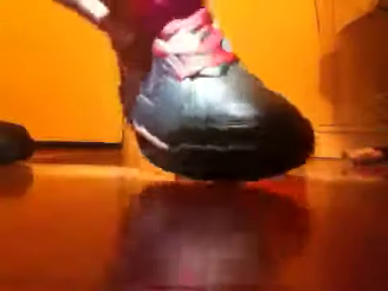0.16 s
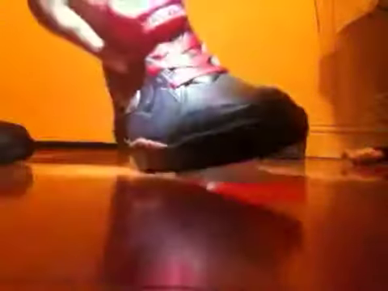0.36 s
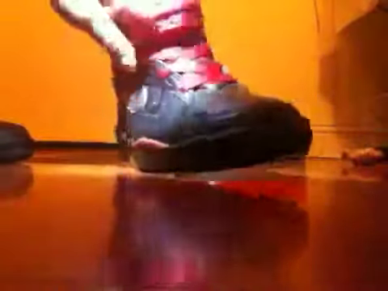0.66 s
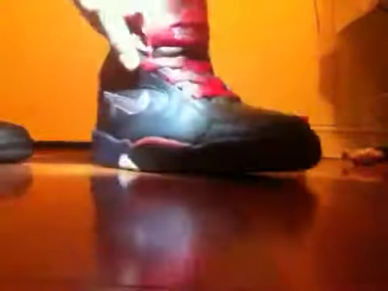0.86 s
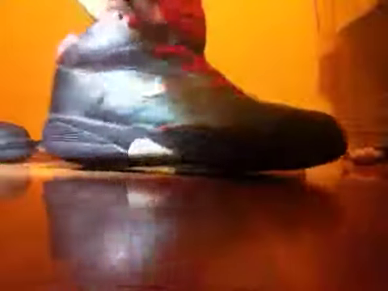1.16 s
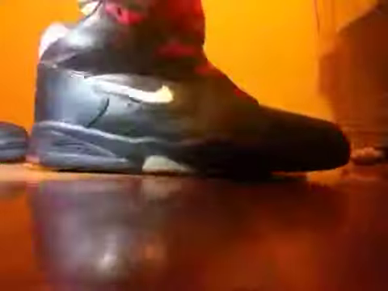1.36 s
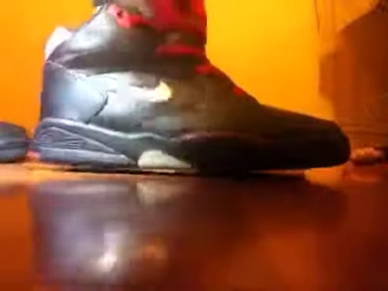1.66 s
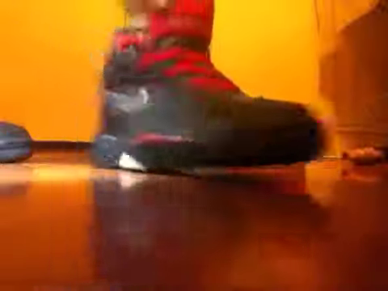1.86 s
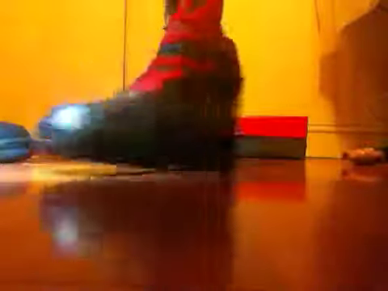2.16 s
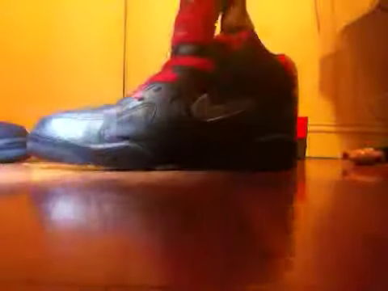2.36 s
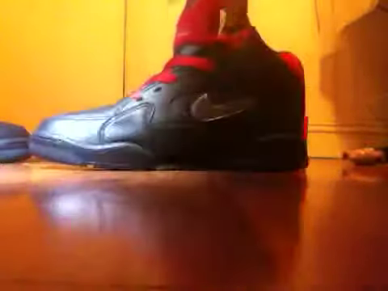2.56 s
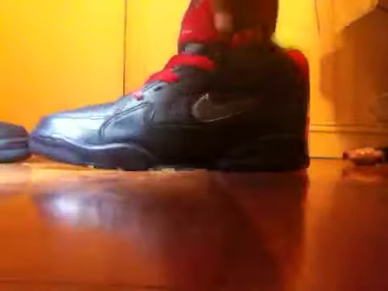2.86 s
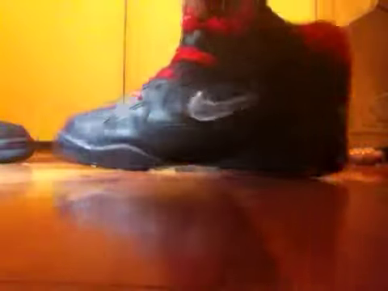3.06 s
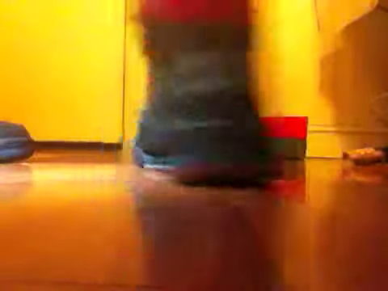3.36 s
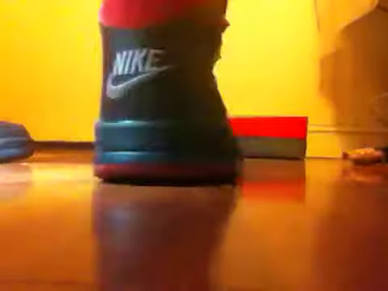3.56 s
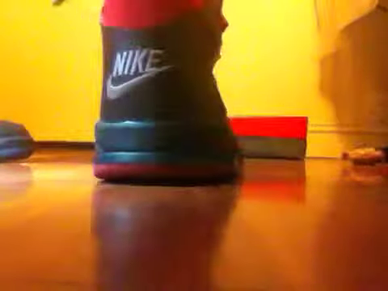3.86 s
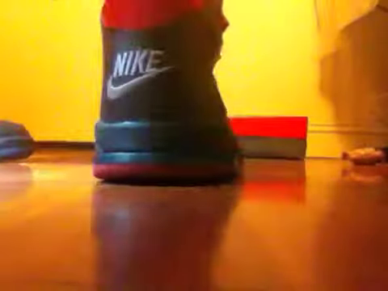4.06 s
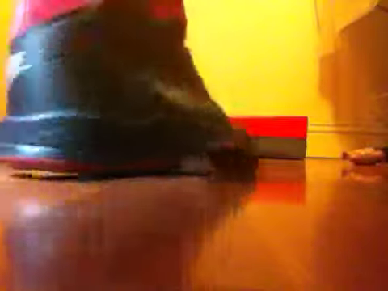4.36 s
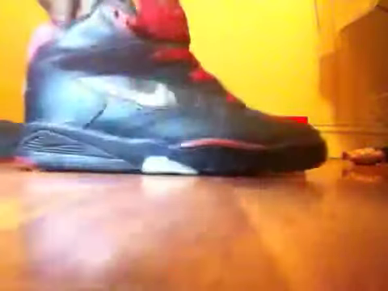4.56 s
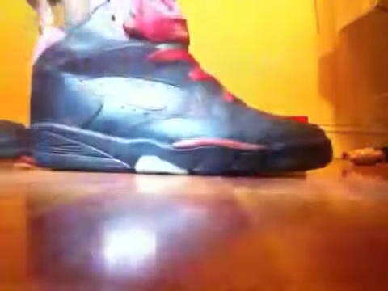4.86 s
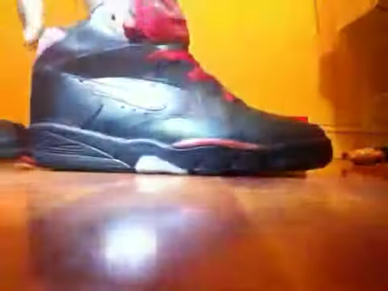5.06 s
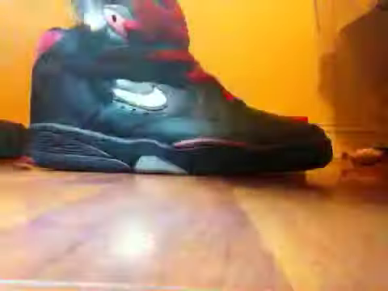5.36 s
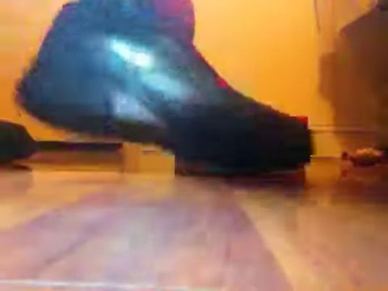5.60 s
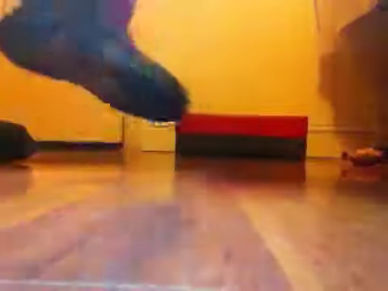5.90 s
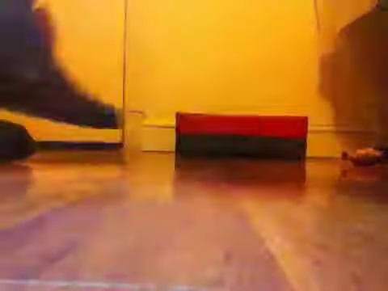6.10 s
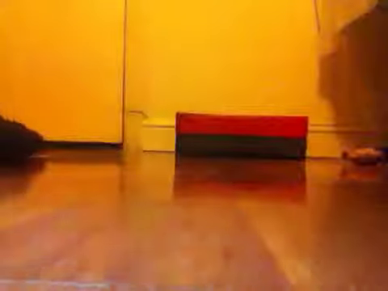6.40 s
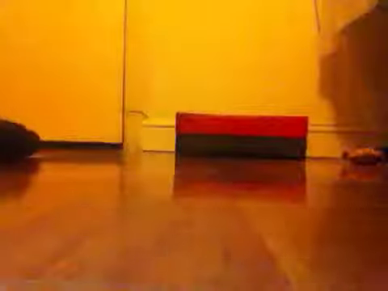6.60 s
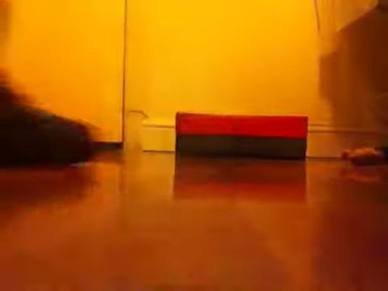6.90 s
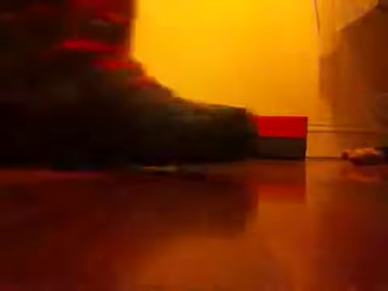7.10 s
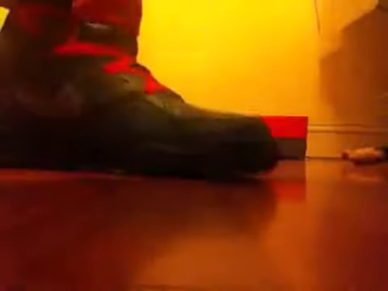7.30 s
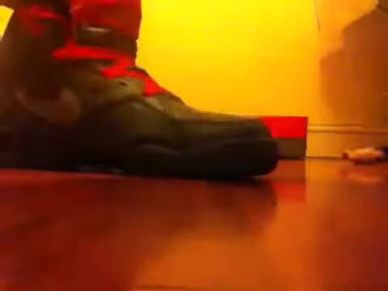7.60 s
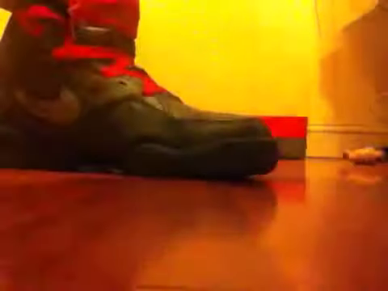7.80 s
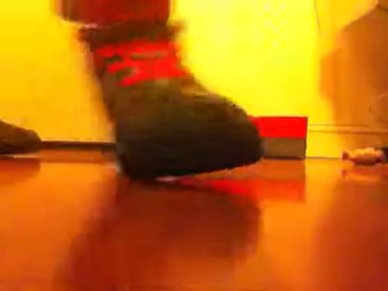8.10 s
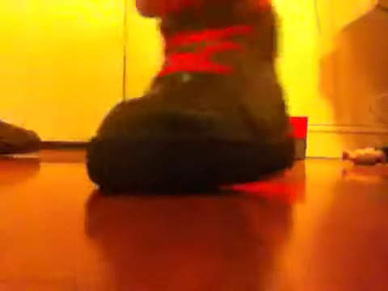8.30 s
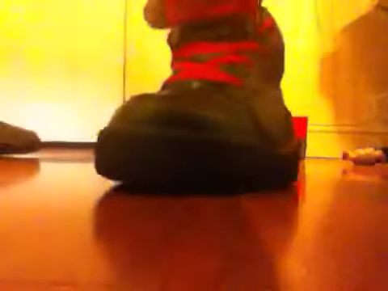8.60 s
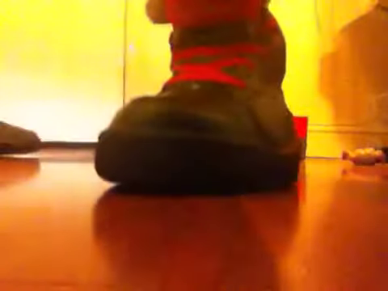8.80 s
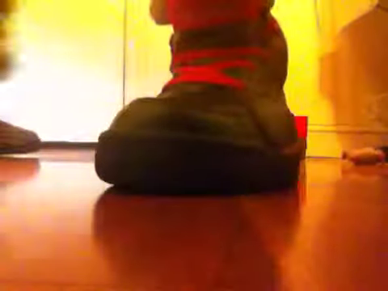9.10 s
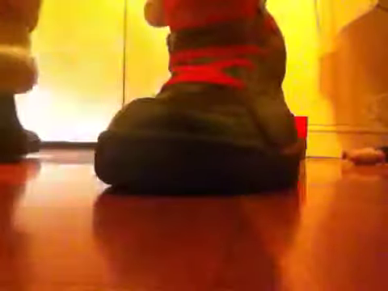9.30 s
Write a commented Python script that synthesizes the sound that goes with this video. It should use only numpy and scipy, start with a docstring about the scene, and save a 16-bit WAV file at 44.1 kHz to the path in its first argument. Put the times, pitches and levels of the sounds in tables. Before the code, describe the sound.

Close dull footfalls and rubbery scuffs on wooden boards in a small room, small clicks, faint cloth rustle, then one snap and a clattering landing.

```python
"""A small room with a hardwood floor: sneakers shift and step close to a microphone that lies on the boards.
Each footfall sends a bending wave through the floor, built as a dispersed pulse with board and room ring.
Soles scuff and cloth rustles as shaped, grainy noise; small bright contacts click on and around the
steps and the landing. A sharp snap is followed by a shoe landing heavily and tumbling further off.
Behind it all: hiss, steady tones, a pulsing whine and a soft tick each second."""
import sys
import numpy as np
from scipy import signal
from scipy.fft import rfft, irfft, next_fast_len
from scipy.io import wavfile
from scipy.ndimage import map_coordinates

SR = 44100
rng = np.random.default_rng(int(sys.argv[2]) if len(sys.argv) > 2 else 0)


def store_pcm(level_fs):
    """Save levels as 16-bit WAV."""
    pcm = np.round(np.clip(level_fs, -1, 1) * 32767).astype(np.int16)
    wavfile.write(sys.argv[1], SR, np.atleast_2d(pcm).T)


N = 416744
TAIL = 32768  # length of rings and frequency responses, samples
TIME = np.arange(N) / SR
TAIL_TIME = np.arange(TAIL) / SR
TAIL_HZ = np.fft.rfftfreq(TAIL, 1 / SR)


def amp(db):
    """Decibels to gain."""
    return 10 ** (np.asarray(db) / 20)


def unit(x):
    """Scale to rms 1."""
    return x / np.sqrt(np.mean(x ** 2) + 1e-20)


def along(points, hz):
    """Read (frequency [Hz], value) points on a log frequency axis."""
    point_hz, value = np.transpose(points)
    return np.interp(np.log(hz + 1), np.log(point_hz + 1), value)


def add(track, start_s, sound):
    """Mix a sound into the track at a time."""
    start = round(start_s * SR)
    track[start:start + len(sound)] += sound[:N - start]


def wobble(rate_hz):
    """A smooth random curve through rate_hz random knots a second."""
    knots = rng.standard_normal(int(N * rate_hz / SR) + 4)
    return map_coordinates(knots, [TIME * rate_hz])


def filtered(x, response):
    """Shape x by a response given as a function of frequency."""
    size = next_fast_len(len(x) + TAIL)
    spectrum = rfft(x, size) * response(np.fft.rfftfreq(size, 1 / SR))
    return irfft(spectrum, size)[:len(x)]


def noise(spectrum, grain_db=0):
    """Coloured noise of rms 1; fast random level changes (grain) make it crackle."""
    white = rng.standard_normal(N) * amp(grain_db * wobble(900))
    return unit(filtered(white, lambda hz: amp(along(spectrum, hz))))


def beats(first_s, period_s, width_s):
    """A row of evenly spaced soft swells."""
    offset = (TIME - first_s + period_s / 2) % period_s - period_s / 2
    return np.exp(-(offset / width_s) ** 2)


# Colour of the hiss: (frequency [Hz], relative density [dB per Hz])
HISS_COLOUR = [(25, -9.5), (65, -52), (100, -13.5), (180, -2), (420, -1.5), (1000, -7.5), (2400, -11.5),
               (6700, -16.5), (8800, -16), (9500, -15.5), (10500, -18.5), (15200, -16.5), (16000, -20.5)]
# Steady electrical tones: (frequency [Hz], level [dB rms])
STEADY_TONES = [(790, -79.5), (15000, -81.5)]


def background(hiss_db=-65, whine_db=-73, tick_db=-66):
    """Hiss, steady tones, a narrow noise band pulsing as a whine, and a soft tick like a far clock."""
    hiss = amp(hiss_db) * noise(HISS_COLOUR)
    tones = sum(amp(db) * np.sqrt(2) * np.sin(2 * np.pi * hz * TIME) for hz, db in STEADY_TONES)

    whine_band = noise([(980, -45), (1080, 0), (1120, 0), (1230, -45)])
    whine_level = amp(whine_db + 2.5 * wobble(2))
    whine = whine_level * beats(first_s=.03, period_s=.298, width_s=.027) * whine_band

    tick_band = noise([(500, -40), (850, -2), (950, 0), (1200, -5), (1700, -17), (3000, -40)])
    tick = amp(tick_db) * beats(first_s=.65, period_s=1, width_s=.042) * tick_band
    return hiss + tones + whine + tick


# Colour of the room tail at its start: (frequency [Hz], relative level [dB])
ROOM_COLOUR = [(50, -4.5), (150, -7), (400, -2.5), (1000, -4), (2000, -3.5), (3400, 3), (5000, -0.5),
               (8000, 1), (11000, 1.5), (15000, -0.5)]
# Time the room takes to die by 60 dB: (frequency [Hz], t60 [s])
ROOM_DECAY = [(100, 0.65), (260, 0.39), (700, 0.47), (1840, 0.38), (3500, 0.3), (6000, 0.41), (14000, 0.32)]


def room(build_s=0.0005):
    """A fresh noise tail of energy 1 in which every frequency dies at its own speed."""
    hz, t, bins = signal.stft(rng.standard_normal(TAIL), SR, nperseg=256)
    decay_db = 60 * t / along(ROOM_DECAY, hz)[:, None]
    fade = amp(along(ROOM_COLOUR, hz)[:, None] - decay_db)
    tail = signal.istft(bins * fade, SR, nperseg=256)[1][:TAIL]
    tail = tail * (1 - np.exp(-TAIL_TIME / build_s))
    return tail / np.linalg.norm(tail)


def strokes(table):
    """Loudness of sliding movements: each starts from rest, speeds up and slows to a stop."""
    skew, swell = 0.69, 1.03  # speeds up faster than it slows; loudness grows as this power of speed
    level = np.zeros(N)
    for start_s, length_s, db in table:
        progress = np.linspace(0, 1, max(round(length_s * SR), 2))
        speed = np.abs(np.sin(np.pi * progress ** skew))
        add(level, start_s, amp(db) * speed ** swell)
    return level


# Colour of rustling fabric: (frequency [Hz], relative density [dB per Hz])
RUSTLE_COLOUR = [(200, -24), (420, 4.5), (850, -0.5), (1400, -5), (3200, -8.5), (5500, -14), (12000, -15.5),
                 (16000, -29)]
# Moves of the leg, one rustle each: (start [s], length [s], level [dB])
LEG_MOVES = [(1.15, 0.76, -69), (1.8, .9, -70), (2.85, 0.88, -64.5), (4.17, 0.52, -66.5), (5.3, 1.8, -73),
             (6.7, 1.8, -71), (8.2, 0.75, -73.5), (8.92, 0.3, -68.5)]


def cloth(resting_db=-79.5):
    """Socks and shoe uppers rustle as the leg moves, over the faint rustle of a leg that stands still."""
    folds = amp(1.5 * wobble(14)) * noise(RUSTLE_COLOUR, grain_db=3)
    return np.hypot(amp(resting_db), strokes(LEG_MOVES)) * folds


# Soles sliding on the varnish: (start [s], length [s], relative level [dB])
SOLE_SLIDES = [(1.06, 0.095, -61.5), (2.27, .09, -67), (2.38, 0.12, -64), (4.53, 0.16, -66),
               (5.05, 0.26, -67), (5.59, 0.074, -73), (5.94, 0.17, -73), (6.07, 0.076, -63.5),
               (7.09, 0.13, -54.5), (7.19, 0.039, -53), (7.46, .11, -61), (7.53, 0.34, -66.5),
               (8.018, .095, -54.5), (8.92, 0.14, -66), (9.08, 0.26, -66.5)]
# Colour of rubber on varnish: (frequency [Hz], relative density [dB per Hz])
SCUFF_COLOUR = [(300, -6.5), (700, 0), (1300, 2), (2100, -2), (3400, -2), (4600, -4.5), (8500, -7.5),
                (13000, -11.5), (16000, -24)]


def scuffs(level_db=-1, room_db=-6):
    """Rubber slides over varnish in a stream of tiny slips; hard drags set the tread chattering."""
    chatter_hz, chatter_q = 2260, 4.2
    chatter_db, chatter_growth = -50.5, 1.39  # level at the hardest drag; power of the stroke
    stroke = strokes(SOLE_SLIDES)
    grip = amp(0.85 * wobble(140))  # the tread catches and lets go
    rub = amp(level_db) * stroke * unit(grip * noise(SCUFF_COLOUR, grain_db=2.5))

    def tread_resonance(hz):
        """Band-pass resonance of the tread."""
        band = 1j * hz * chatter_hz / chatter_q
        return band / (chatter_hz ** 2 - hz ** 2 + band)

    ring = unit(filtered(grip * noise(SCUFF_COLOUR, grain_db=3.5), tread_resonance))
    drag = (stroke / stroke.max()) ** chatter_growth
    slide = rub + amp(chatter_db) * drag * ring
    return slide + amp(room_db) * signal.fftconvolve(slide, room())[:N]


def causal(spectrum):
    """Minimum-phase response with the given (frequency [Hz], level [dB]) colour."""
    cepstrum = irfft(np.log(amp(along(spectrum, TAIL_HZ))))
    cepstrum[1:TAIL // 2] *= 2  # fold the cepstrum onto positive time
    cepstrum[TAIL // 2 + 1:] = 0
    return np.exp(rfft(cepstrum))


def pulse(response, spread):
    """A pulse of peak 1; spread delays the lows behind the highs, as in a bending wave."""
    dispersion = np.exp(-2j * np.pi * abs(spread) * np.sqrt(TAIL_HZ))
    wave = irfft(response * dispersion)[:TAIL // 8]
    return wave / np.abs(wave).max()


def patter(sound, life_s, above_hz):
    """Break the treble of a pulse into many tiny contacts that die by 60 dB within life_s."""
    burst = rng.standard_normal(TAIL) * amp(-60 * TAIL_TIME / life_s)
    burst = burst / np.linalg.norm(burst)
    treble = TAIL_HZ ** 4 / (TAIL_HZ ** 4 + above_hz ** 4)
    scatter = np.sqrt(1 - treble) + np.sqrt(treble) * rfft(burst)
    return irfft(rfft(sound, TAIL) * scatter)[:len(sound)]


def with_tail(contact, tail, life_s, above_hz):
    """The rough-edged direct sound plus the ring that the contact excites."""
    direct = np.pad(patter(contact, life_s, above_hz), (0, len(tail) - 1))
    return direct + signal.fftconvolve(contact, tail)


# Small hard contacts of laces and sole edges: (time [s], relative level [dB])
SMALL_CONTACTS = [(0.083, -52), (1.072, -53.5), (1.089, -43.5), (1.104, -47.5), (2.315, -50), (3.494, -41),
                  (5.546, -46.5), (5.603, -52.5), (5.634, -45), (5.648, -51), (6.528, -33), (6.541, -29.5),
                  (6.868, -50.5), (7.196, -34.5), (7.212, -43), (8.049, -45), (8.343, -48), (8.797, -43.5)]


def clicks(level_db=9, room_db=-2):
    """Lace tips and sole edges tick against shoe and floor as short bright pulses."""
    track = np.zeros(N)
    colour = [(150, 0), (800, 6.5), (2200, 4), (4500, -7.5), (9000, -11), (16000, -15)]
    tick = pulse(causal(colour), spread=0)
    for time_s, db in SMALL_CONTACTS:
        sound = with_tail(tick, amp(room_db) * room(), life_s=0.029, above_hz=470)
        add(track, time_s, amp(db + level_db) * sound)
    return track


# Colour of the snap: (frequency [Hz], relative density [dB per Hz])
SNAP_COLOUR = [(300, -9), (700, -15.5), (1100, 0.5), (2400, -2.5), (3500, 2), (5100, -5.5), (7500, -3.5),
               (9800, -8), (11800, -4), (16000, -16)]


def snap(time_s=6.1752, level_db=-15, room_db=-8, beam_hz=6000):
    """One dry, bright snap; its treble is beamed at the microphone, so the room answers darker."""
    track = np.zeros(N)
    crack = pulse(causal(SNAP_COLOUR), spread=0.097)
    echo = filtered(room(), lambda hz: 1 / np.sqrt(1 + (hz / beam_hz) ** 2))
    sound = with_tail(crack, amp(room_db) * echo, life_s=.003, above_hz=14000)
    add(track, time_s, amp(level_db) * sound)
    return track


# Modes in which floor and room ring together: (frequency [Hz], mean relative level [dB], t60 [s])
FLOOR_MODES = [(130.5, -9.5, 0.55), (152.5, -3.5, 0.56), (180.3, -7.5, 0.53), (194.4, 2, 0.34),
               (241.5, -8.5, 0.36), (290, -5, 0.16), (312, 2, 0.13), (404, -3.5, 0.61), (419, 5, 0.47),
               (520, -15, 0.43), (640, -4, 0.48), (720, 3.5, 0.25), (776, 5, 0.39), (977, -3, .33),
               (1050, -9, .36), (1230, -17, 0.31), (1427, -1, 0.3), (1540, -11, .28), (1860, -6, 0.29),
               (1920, -6, .27), (2770, -9, .27), (3420, -8, .27)]


def boards():
    """Decaying sines for the floor's modes, at new strengths for each blow; energy 1."""
    hz, db, t60 = np.transpose(FLOOR_MODES)[:, :, None]
    strength_db = rng.normal(0, 1, hz.shape)
    phase = rng.uniform(0, 2 * np.pi, hz.shape)
    decay = amp(db + strength_db - 60 * TAIL_TIME / t60)
    ring = np.sum(decay * np.sin(2 * np.pi * hz * TAIL_TIME + phase), axis=0)
    return ring / np.linalg.norm(ring)


# Sole colour at zero hardness offset: (frequency [Hz], level relative to the boom [dB])
SOLE_COLOUR = [(950, -7.5), (2000, -11), (3400, -16.5), (4800, -28), (9000, -35.5), (15000, -44)]


def thud(boom_hz, knock_db, tick_db, spread, q=1.17, low_hz=110):
    """One blow on the boards: a boom whose upper reach depends on the hardness of the contact."""
    hardness = [(950, knock_db), (2000, tick_db)]
    upper = [(hz, db + along(hardness, hz)) for hz, db in SOLE_COLOUR]
    contact = causal([(boom_hz, 0)] + upper)
    s = 1j * TAIL_HZ / (0.8 * boom_hz)
    flex = s * s / (s * s + s / q + 1)  # the boards radiate little below their boom
    low = 1j * TAIL_HZ / low_hz
    low_cut = low * low / (low * low + np.sqrt(2) * low + 1)  # a small microphone misses deep bass
    return pulse(contact * flex * low_cut, spread)


def blows(table, spread, slap_s, tick_db, air_db, ring_db):
    """Thuds that reach the microphone through the floor and ring in boards and room."""
    tick_per_knock = 0.97  # dB of tick gained per dB of knock near 1 kHz
    track = np.zeros(N)
    for time_s, db, boom_hz, hard_db, room_db in table:
        tail = amp(room_db) * (amp(air_db) * room() + amp(ring_db) * boards())
        contact = thud(boom_hz, hard_db, tick_db + tick_per_knock * hard_db, spread)
        add(track, time_s, amp(db) * with_tail(contact, tail, slap_s, above_hz=1230))
    return track


# A shoe lands and tumbles further off:
# (time [s], blow level [dB], boom [Hz], hardness offset [dB], relative tail level [dB])
SHOE_LANDINGS = [(6.3295, -29.5, 426, 4, -2), (6.347, -24.5, 318, -5, -1), (6.375, -33, 174, -25, -2.5),
                 (6.425, -34.5, 280, -7, 0), (6.522, -23.5, 208, -18, -1), (6.526, -16, 343, -4, 1),
                 (6.5355, -17.5, 189, -5, -.5), (6.615, -28.5, 275, -11, 5)]


def landing():
    """A shoe strikes the boards in a quick run of blows."""
    return blows(SHOE_LANDINGS, spread=0.0507, slap_s=0.012, tick_db=-3, air_db=2.5, ring_db=-14.5)


# Soles meet the floor:
# (time [s], blow level [dB], boom [Hz], hardness offset [dB], relative tail level [dB])
FOOTFALLS = [(.110, -26.5, 280, -18, -12.5), (.364, -43.5, 298, -23, -7), (.878, -25, 324, -14.5, -7.5),
             (.900, -28, 202, -10.5, -6.5), (1.477, -50, 190, -29, -12), (1.8665, -33.5, 220, -5.5, -5),
             (2.278, -40.5, 280, -18.5, -3.5), (2.338, -42.5, 195, -30, -6), (2.474, -46.5, 220, -17, -6),
             (2.497, -47, 195, -17, -2), (3.315, -33.5, 189, -18.5, -7), (3.476, -21.5, 204, -6.5, -12),
             (4.230, -45, 250, -19, -10.5), (4.298, -48, 177, -29, -9), (4.563, -46.5, 212, -19, -5),
             (5.635, -50, 344, 0, 2.5), (6.858, -44, 380, -12, -11), (6.936, -31, 185, -5, -3.5),
             (7.102, -29, 209, -18.5, -4.5), (7.3295, -41.5, 230, -13, -10.5),
             (8.448, -56.5, 218, -13, -10), (8.641, -51.5, 186, -28, -9), (8.796, -35, 404, 6, -11.5),
             (9.402, -36, 209, -17, -13.5)]


def steps():
    """Near footfalls drive bending waves through the boards."""
    return blows(FOOTFALLS, spread=0.0865, slap_s=0.02, tick_db=-10.5, air_db=5.5, ring_db=-16.5)


def scene():
    """Background, small sounds, the far landing and the near steps, in one channel."""
    small_sounds = cloth() + scuffs() + clicks() + snap()
    return (background() + small_sounds + landing() + steps())[None]


def record(dry, top_hz=15900):
    """The microphone's channel keeps nothing from its band limit upward."""
    return filtered(dry[0], lambda hz: hz < top_hz)[None]


dry = scene()
out = record(dry)
store_pcm(out)
```